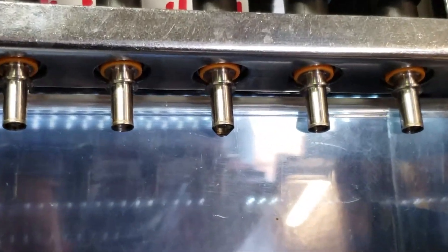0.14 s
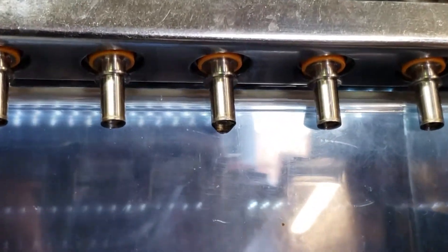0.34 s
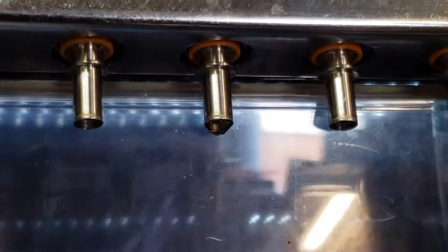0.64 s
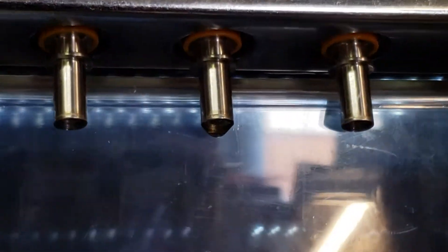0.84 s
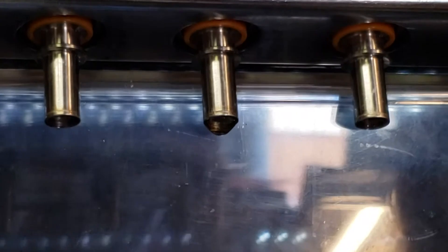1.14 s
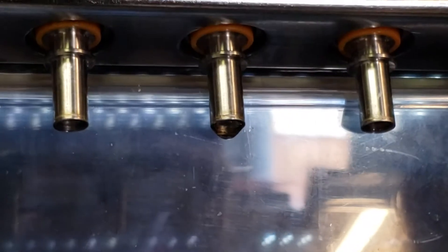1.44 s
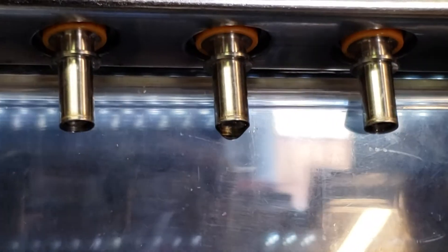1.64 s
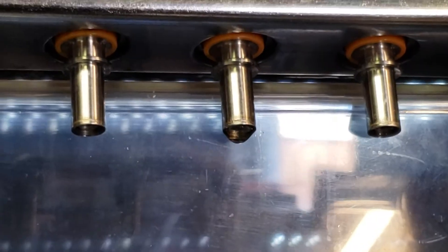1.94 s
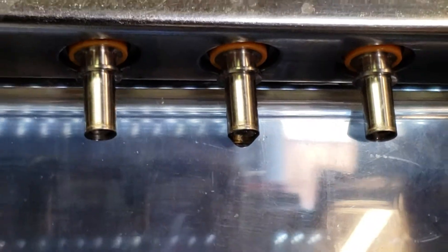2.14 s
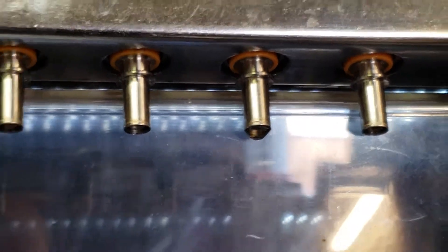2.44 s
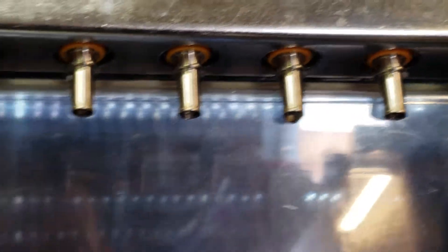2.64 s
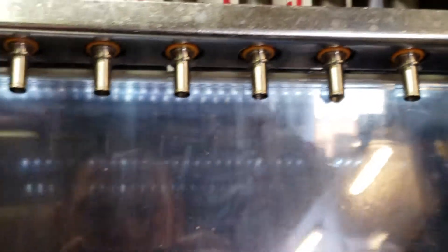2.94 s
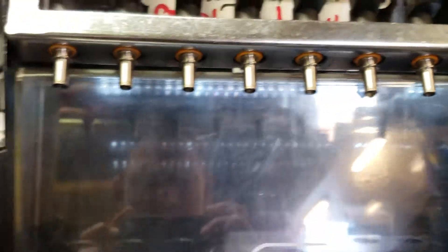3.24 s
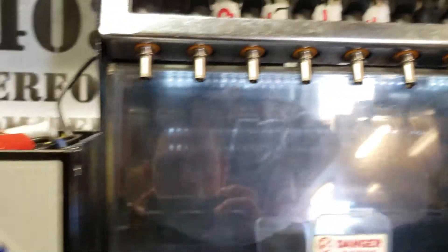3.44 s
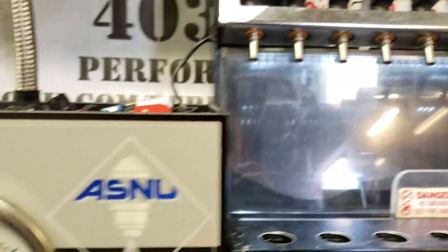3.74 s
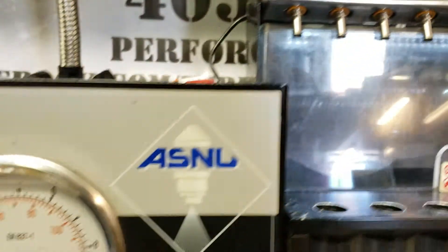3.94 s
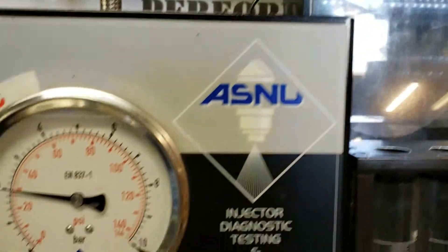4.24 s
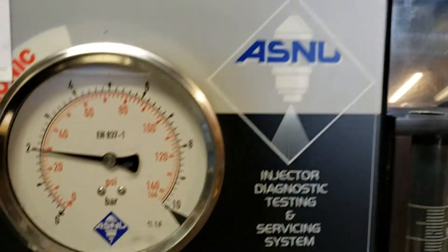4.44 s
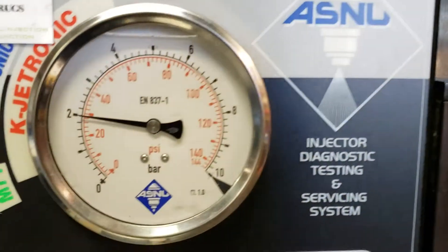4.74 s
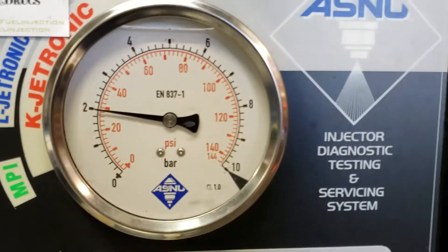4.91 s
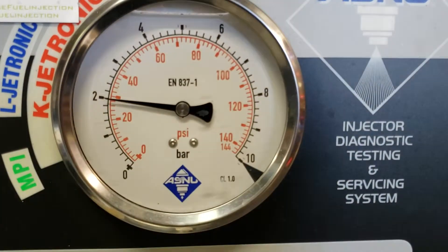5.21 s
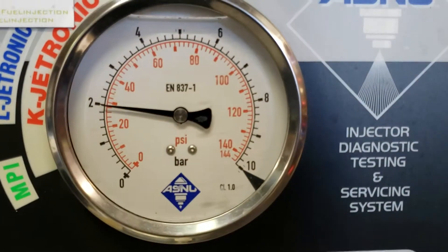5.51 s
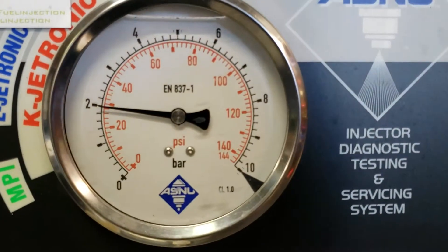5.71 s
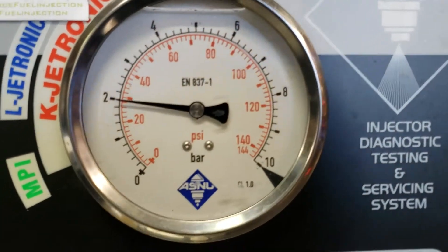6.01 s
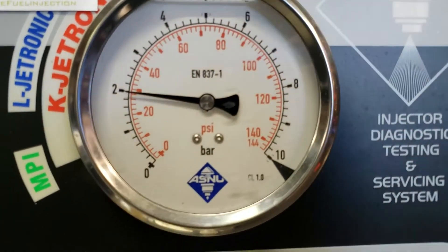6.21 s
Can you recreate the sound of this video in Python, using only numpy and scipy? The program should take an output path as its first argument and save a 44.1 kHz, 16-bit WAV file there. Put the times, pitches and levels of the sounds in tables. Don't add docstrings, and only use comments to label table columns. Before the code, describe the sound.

A handheld stereo microphone hears a running machine up close indoors: deep mains and motor hum, steady mid-pitched whine with a bright edge, liquid rush and tiny high spits. Early on the pump stops dead with a quick rattle of snaps and dull clunks. The sound becomes thinner and calmer, a low hum wavering about seven times a second, soft hiss pulsing with it, and quiet workshop rumble to the end.

```python
import sys
import numpy as np
from scipy import signal
from scipy.fft import rfft, irfft, next_fast_len
from scipy.io import wavfile
from scipy.ndimage import uniform_filter1d, map_coordinates

SR = 44100
rng = np.random.default_rng(int(sys.argv[2]) if len(sys.argv) > 2 else 0)


def magnitude_from_level(level_db):
    exponent = np.asarray(level_db, float) / 20
    return 10 ** exponent


def waveform_to_disk(signal):
    frames = np.transpose(np.atleast_2d(signal))
    scaled = np.clip(frames, -1, 1) * 32767
    samples = np.round(scaled).astype(np.int16)
    wavfile.write(sys.argv[1], SR, samples)


N = 280917
TIME_S = np.arange(N) / SR

IN_STEP_S = 4.366
PUMP_STEP_S = 0.729
SHAFT_HZ = 52.096
STOP_S, DRAINED_S = 1.612, 1.77


def unit(x):
    return x / np.sqrt(np.mean(x ** 2) + 1e-20)


def along(points, hz):
    f, v = np.transpose(points)
    return np.interp(np.log(hz + 1), np.log(f + 1), v)


def wobble(rate):
    coarse = np.arange(0, N + 64, 64)
    knots = rng.standard_normal(int(N * rate / SR) + 4)
    return np.interp(np.arange(N), coarse, map_coordinates(knots, [coarse * rate / SR]))


def filtered(x, response):
    m = next_fast_len(x.shape[-1] + 8192)
    return irfft(rfft(x, m) * response(np.fft.rfftfreq(m, 1 / SR)), m)[..., :x.shape[-1]]


def sides(pan_db):
    return magnitude_from_level(np.array([pan_db / 2, -pan_db / 2]))


def after(s):
    return np.maximum(TIME_S - s, 0)


# frequency in Hz, left over right in dB.
BODY_SHADING = [(60, -2.5), (600, 1), (2400, 2), (4400, -1.5), (8100, 1.5), (13000, -1.5)]


def rush(spectrum, alike, patchy_db, lag_s):
    z = signal.stft(rng.standard_normal((2, N)), nperseg=512)[2]
    field = uniform_filter1d(rng.standard_normal(z.shape[1:]), size=6, axis=0)
    field = uniform_filter1d(field, size=10, axis=1)
    pair = signal.istft(z * magnitude_from_level(patchy_db * unit(field)), nperseg=512)[1][:, :N]

    def mid_side(hz):
        angle = np.arccos(np.clip(along(alike, hz), -1, 1)) / 2
        return magnitude_from_level(along(spectrum, hz)) * [np.cos(angle), np.sin(angle)]

    def ports(hz):
        lead = np.exp(1j * np.pi * lag_s * np.outer([1, -1], hz))
        return sides(along(BODY_SHADING, hz)) * lead

    mid, side = filtered(pair, mid_side)
    return unit(filtered(np.array([mid + side, mid - side]), ports))


def place(sounds):
    out = np.zeros((2, N + SR))
    for s, sound, pan_db in sounds:
        start = round(s * SR)
        out[:, start:start + sound.shape[-1]] += sound * sides(pan_db)[:, None]
    return out[:, :N]


def burst(db, hz, width_hz, t60):
    t = np.arange(SR // 4) / SR
    noise = filtered(rng.standard_normal((2, len(t))), lambda f: 1 / (1 + ((f - hz) / width_hz * 2) ** 4))
    fade = magnitude_from_level(-60 * t / t60) * (1 - np.exp(-t / 0.0013))
    even = np.linalg.norm(fade) / np.linalg.norm(fade * noise, axis=1, keepdims=True)
    return magnitude_from_level(db - 2.5) * fade * noise * even


def ring(db, modes, rise_s):
    t = np.arange(SR // 4) / SR
    slips = 0.011 * np.cumsum(rng.standard_normal((len(modes), len(t))), axis=1)
    out = np.zeros(len(t))
    for (hz, level_db, t60), slip in zip(modes, slips):
        fade = magnitude_from_level(db + level_db - 60 * t / t60)
        out += fade * np.sin(2 * np.pi * hz * t + slip * hz / 400)
    return (1 - np.exp(-t / rise_s)) * out


def struck(blows, modes, rise_s, pan_db):
    return place([(s, ring(db, modes, rise_s), pan_db) for s, db in blows])


HUM_TONES_HZ = [27.07, 56.58, 108.27, 113.17, 120.06, 169.73, 176.63, 196.8, 199.24, 216.52, 226.31, 240.1,
                379.57, 759.11, 867.15]
MOTOR_SECOND_HZ, MAINS_HZ = HUM_TONES_HZ[3], HUM_TONES_HZ[4]
# level at the nozzles in dB, level at the gauge in dB,
# left over right at the nozzles in dB, left over right at the gauge in dB, left lead in radians.
HUM_LEVELS = [(-57.5, -58.5, -.5, -.8, 0), (-41.2, -45.3, -1.7, -3.2, .1), (-47.5, -40.2, 6.4, 3.6, .2),
              (-53.8, -48, 6.9, 3.1, .1), (-39.8, -35.4, 4, 2.8, .3), (-57.8, -51.6, 4.9, 1.4, -.1),
              (-53.1, -50.9, 4.3, 1, .1), (-54.3, -53.4, 2.3, -.1, .2), (-56.5, -55.9, 2.4, -.1, .2),
              (-46.4, -44, 3.6, -1.1, .5), (-55.9, -53.3, 2, -1.1, .3), (-47.9, -48.4, 1.3, -2.3, .2),
              (-60.3, -59.7, 4.3, 3.9, -.7), (-72, -68, -.1, -.8, -.8), (-64.9, -70.9, -.5, 6.7, 1.3)]
# time in seconds, share of the way to the gauge from 0 to 1.
MICROPHONE_WALK = [
    (0, .01),
    (2.6, 0),
    (3.2, 0.13),
    (3.8, 0.6),
    (4.4, 0.8),
    (5.1, 1),
    (6.4, 1),
]


def hum():
    walk_s, share = np.transpose(MICROPHONE_WALK)
    way = np.interp(TIME_S, walk_s, share)
    t, out = TIME_S - IN_STEP_S, np.zeros((2, N))
    for hz, (near_db, far_db, near_pan_db, far_pan_db, lead) in zip(HUM_TONES_HZ, HUM_LEVELS):
        start = 0 if 100 < hz < 125 else rng.uniform(0, 2 * np.pi)
        level = magnitude_from_level(near_db + way * (far_db - near_db) + 0.51 * wobble(2.75))
        pan_db = near_pan_db + way * (far_pan_db - near_pan_db)
        swing = np.cos(2 * np.pi * hz * t + start + np.array([[lead / 2], [-lead / 2]]))
        out += np.sqrt(2) * level * sides(pan_db) * swing
    return out


STRONG_ORDERS = [1, 2, 3, 5, 9, 10, 11, 12, 18, 19, 26, 27, 28, 36, 45, 54, 63, 71, 72, 73, 88, 90, 99, 107,
                 117, 119, 124, 126, 134, 135]
# level in dB, left over right in dB, left lead in radians.
ORDER_LEVELS = [(-54.5, 14, -3), (-42, -2.5, 0), (-53, 20, -0.5), (-46.5, 1.5, 0.3), (-39, 0.5, 0.47),
                (-81, 3, 12), (-59.5, -3, -0.5), (-73, 21, -0.5), (-48, 8, 1.35), (-64, -5, 5.5),
                (-66, -9, 6.5), (-55.5, 4.5, -5.5), (-70.5, 26, 2), (-54.5, 5.5, 1.95), (-56.5, -0.5, 4),
                (-64, 14, -0.5), (-66.5, 18, 2.5), (-57, 6, -3.5), (-57, -3, 2.5), (-69, 7, 11),
                (-63.5, -5, -1), (-64, -18, 4), (-69, -23, 1.5), (-93, -4, -7), (-93, -20, -3),
                (-69.5, 21.5, 9.5), (-58, -9, -4), (-63, 7, -20), (-56, 13, 3), (-53, -3, 4)]
# frequency in Hz, level in dB.
FAINT_ORDERS = [(200, -100), (350, -79), (1000, -93), (3000, -82), (6500, -77), (7800, -104), (9500, -82.5),
                (12000, -69.5), (15000, -78)]


def pump_whine():
    span = 2 * SR
    turn = 2 * np.pi * SHAFT_HZ * (TIME_S - PUMP_STEP_S) + 0.0033 * wobble(2.9)
    cycle = np.arange(4096) * 2 * np.pi / 4096
    every = np.arange(1, 300)[:, None]
    scatter_db = 1.5 * rng.standard_normal((2, len(every), 1))
    faint = magnitude_from_level(along(FAINT_ORDERS, every * SHAFT_HZ) + scatter_db)
    shape = (faint * np.cos(every * cycle + rng.uniform(0, 2 * np.pi, faint.shape))).sum(axis=1)
    for k, (db, pan_db, lead) in zip(STRONG_ORDERS, ORDER_LEVELS):
        start = rng.uniform(0, 2 * np.pi)
        if k == 2:
            start = 2 * np.pi * MAINS_HZ * (PUMP_STEP_S - IN_STEP_S)
        swing = np.cos(k * cycle + start + np.array([[lead / 2], [-lead / 2]]))
        shape += magnitude_from_level(db) * sides(pan_db)[:, None] * swing
    unsteady = np.sqrt(2) * magnitude_from_level(0.6 * wobble(11.8)[:span])
    tones = np.zeros((2, N))
    tones[:, :span] = [unsteady * np.interp(turn[:span], cycle, side, period=2 * np.pi) for side in shape]
    return magnitude_from_level(-1.5 - 750 * after(STOP_S)) * tones


# frequency in Hz, level in dB per Hz.
FLOW_SPECTRUM = [(150, -44), (300, -11), (700, -7), (1100, -15.5), (2500, -12.5), (4700, -12),
                 (7000, -10.5), (8000, -18.5), (9300, -19), (10500, -16), (12000, -8), (13500, -15),
                 (15700, -20)]
# frequency in Hz, width in Hz, gain in dB.
CABINET_RESONANCES = [(590, 50, 0.5), (1240, 46, 5.5), (4700, 150, -0.5), (6180, 140, -2.5)]


def fuel_flow():
    def resonances(f):
        return 1 + sum(magnitude_from_level(db) * 1j * f * w / (c * c - f * f + 1j * f * w) for c, w, db in CABINET_RESONANCES)

    alike = [(300, 0.73), (1400, 0.49), (5000, 0.23), (12000, 0.16)]  # (Hz, left-right likeness)
    flow = unit(filtered(rush(FLOW_SPECTRUM, alike, patchy_db=2.0, lag_s=0), resonances))
    flow = flow * (1 + 0.15 * np.cos(2 * np.pi * SHAFT_HZ * TIME_S))
    flow = flow * magnitude_from_level(0.44 * wobble(34.4)) * sides(0.39)[:, None]
    surge_db = 1.5 * np.exp(-((TIME_S - STOP_S) / 0.015) ** 2)
    sag_db = -4 * np.clip(after(STOP_S) / 0.053, 0, 1)
    drain_db = -150 * after(DRAINED_S)
    return magnitude_from_level(surge_db + sag_db + drain_db - 0.8 - 44.5) * flow


# rate in Hz, depth in dB, moment of a crest in seconds.
SWELL_LURCHES = [(2.05, 0.2, 4.464), (2.44, 1.2, 4.292), (4.88, .5, 4.366)]


def swells():
    late_s, width_s = 0.046, 0.029
    beats = IN_STEP_S + late_s + np.arange(-31, 16) / (MAINS_HZ - MOTOR_SECOND_HZ)
    chance = rng.standard_normal((len(beats), 2))
    pressed_db = 2 * (beats < DRAINED_S)
    size_db = -51 + pressed_db + 0.7 * chance[:, 0]
    for hz, db, crest_s in SWELL_LURCHES:
        size_db = size_db + db * np.cos(2 * np.pi * hz * (beats - crest_s))
    power = np.zeros(N)
    for s, db in zip(beats + 0.0051 * chance[:, 1], size_db):
        power += magnitude_from_level(2 * db) * np.exp(-((TIME_S - s) / width_s) ** 2)
    return np.sqrt(power)


# frequency in Hz, level in dB per Hz.
LEAK_SPECTRUM = [(150, -64), (500, -6), (2500, -15.5), (6000, -12), (8500, -21.5), (10300, -16.5),
                 (12000, 0.5), (13200, -13.5), (15700, -18.5)]


def air_leak():
    flutter = 1 + 0.11 * np.cos(2 * np.pi * HUM_TONES_HZ[1] * TIME_S)
    level = swells() * flutter * magnitude_from_level(0.91 * wobble(30) + 1.5)
    return level * rush(LEAK_SPECTRUM, [(1000, 0.26)], patchy_db=2.0, lag_s=0.000297)


# frequency in Hz, level in dB per Hz.
AIR_SPECTRUM = [(410, -20), (700, -13.5), (757, 0.5), (839, -13.5), (956, -7), (1510, -8.5), (2400, -9),
                (3830, -13), (6440, -13.5), (7330, -14), (8350, -29), (10800, -16), (11900, -8),
                (15600, -32)]
# frequency in Hz, level in dB per Hz.
RUMBLE_SPECTRUM = [(15, -30), (30, -12.5), (55, 0.5), (85, -6), (150, -5.5), (225, 3.5), (275, -11),
                   (350, -8.5), (410, -13.5), (800, -15.5), (1100, -22.5), (2000, -40.5)]
# frequency in Hz, left-right likeness from 0 to 1.
ROOM_LIKENESS = [(25, .99), (60, .985), (290, .91), (640, .4), (1400, .08), (15000, .1)]


def workshop():
    air = rush([(300, -66)] + AIR_SPECTRUM, ROOM_LIKENESS, patchy_db=0.8, lag_s=0.000305)
    air = magnitude_from_level(-49.5 + 0.28 * wobble(2.17)) * sides(1.0)[:, None] * air
    rumble = rush(RUMBLE_SPECTRUM, ROOM_LIKENESS, patchy_db=1.64, lag_s=0.0001)
    rumble = magnitude_from_level(-43 + 0.23 * wobble(1.56)) * sides(0.34)[:, None] * rumble
    return air + rumble


# frequency in Hz, level in dB, left over right in dB.
BLADE_TONES = [(339, -59.5, 4), (437, -65.5, -7), (538, -70, 9), (573, -67, 10), (592, -63.5, -2),
               (652, -70, 0), (753, -69.5, 7), (951, -64.5, -1), (980, -69, 1), (1024, -71, 4),
               (1093, -86, -14), (1123, -84, -10), (1146, -73, 5), (1216, -71, -3), (1952.5, -83.5, -9)]


def blades():
    out = np.zeros((2, N))
    for hz, db, pan_db in BLADE_TONES:
        drift = 0.6 * wobble(4) + 0.79 * np.array([wobble(1.47), wobble(1.56)])
        level = np.sqrt(2) * magnitude_from_level(db - 4.0 + 3.5 * wobble(5)) * sides(pan_db)[:, None]
        out += level * np.cos(2 * np.pi * hz * TIME_S + drift)
    return out


# start in seconds, peak in dB,
# pitch in Hz, left over right in dB.
TICKS = [(0.1413, -34, 4730, -2), (.17, -35, 4700, -4), (.265, -37, 1240, 3), (.7088, -37, 6720, 0),
         (.9896, -34, 4300, -3), (1.588, -43, 5000, 0), (1.612, -38, 7550, -4), (1.645, -36, 4600, -1),
         (1.653, -26.5, 13000, -3), (1.742, -40, 4970, -2), (1.757, -38, 4700, -3), (1.8, -43, 4800, -2),
         (1.82, -40, 860, 6), (1.985, -38.5, 5850, 5), (1.993, -37, 5740, 0)]


def rail_ticks():
    return place([(s, burst(db, hz, hz / 4.1, t60=0.051), pan_db) for s, db, hz, pan_db in TICKS])


# frequency in Hz, level in dB, 60 dB decay in seconds.
PIPE_MODES = [(582, 2, 0.089), (632, -11.5, 0.21), (692, -8, 0.091), (1240, -16, 0.073)]
# start in seconds, peak in dB.
PIPE_HITS = [
    (.145, -41),
    (.19, -35),
    (1.59, -34),
    (1.618, -37),
    (1.632, -27.5),
]


def pipe():
    return struck(PIPE_HITS, PIPE_MODES, rise_s=0.007, pan_db=7)


# start in seconds, peak in dB.
FUEL_SPITS = [(.35, -42), (.69, -37), (.74, -36), (.845, -40), (1.039, -34), (1.0874, -42), (1.1837, -35),
              (1.255, -44), (1.405, -37), (1.614, -40), (1.735, -45), (6.36, -37)]


def spits():
    return place([(s, burst(db, 13000, 5600, t60=0.048), -1.5) for s, db in FUEL_SPITS])


# frequency in Hz, level in dB, 60 dB decay in seconds.
PANEL_MODES = [(243, -2, .125), (130, -1, 0.093)]
# start in seconds, peak in dB.
PANEL_HITS = [
    (1.6435, -24),
    (1.662, -24.5),
    (1.739, -39),
]


def panel():
    return struck(PANEL_HITS, PANEL_MODES, rise_s=0.0026, pan_db=2.1)


# frequency in Hz, width in Hz, peak in dB, 60 dB decay in seconds,
# left over right in dB.
RELAY_BANDS = [
    (445, 550, -33, 0.2, 2),
    (5500, 6300, -33, 0.047, 0),
    (9900, 400, -35, 0.037, 3),
    (12400, 5500, -31.5, 0.051, -3),
]


def relay():
    return place([(1.688, burst(db, hz, width_hz, t60), pan_db) for hz, width_hz, db, t60, pan_db in RELAY_BANDS])


# frequency in Hz, level in dB, 60 dB decay in seconds.
ARMATURE_MODES = [(528, -1, 0.057), (1206, -4.5, 0.049), (1594, -11, 0.067), (2430, -7, 0.061),
                  (2680, -8.5, 0.049)]
# start in seconds, peak in dB.
ARMATURE_HITS = [
    (1.692, -31.5),
    (1.718, -39),
]


def armature():
    rattle = place([(s, burst(db - 5, 1590, 2200, t60=0.11), 2.1) for s, db in ARMATURE_HITS])
    return rattle + struck(ARMATURE_HITS, ARMATURE_MODES, rise_s=0.0022, pan_db=2.5)


# frequency in Hz, level in dB, 60 dB decay in seconds.
CABINET_MODES = [(129, 0, 0.13), (405, -1, 0.092)]
# start in seconds, peak in dB.
CABINET_HITS = [
    (1.7, -30),
    (1.723, -37),
]


def cabinet():
    return struck(CABINET_HITS, CABINET_MODES, rise_s=0.0035, pan_db=0.4)


def scene():
    steady = hum() + pump_whine() + fuel_flow() + air_leak() + workshop() + blades()
    shutdown = rail_ticks() + pipe() + spits() + panel() + relay() + armature() + cabinet()
    return steady + shutdown


def low_pass(x):
    return signal.sosfilt(signal.butter(12, 15800, fs=SR, output="sos"), x)


def record(dry):
    return low_pass(dry)


dry = scene()
out = record(dry)
waveform_to_disk(out)
```